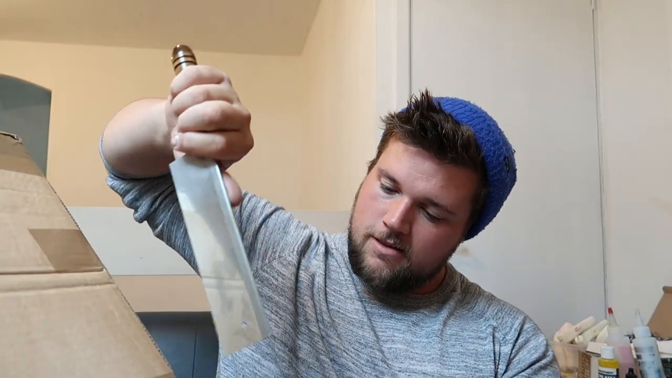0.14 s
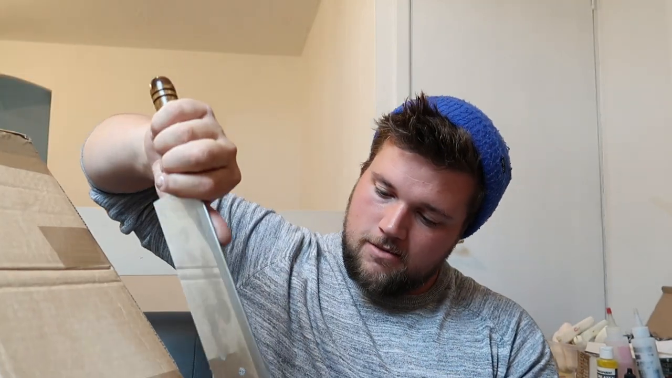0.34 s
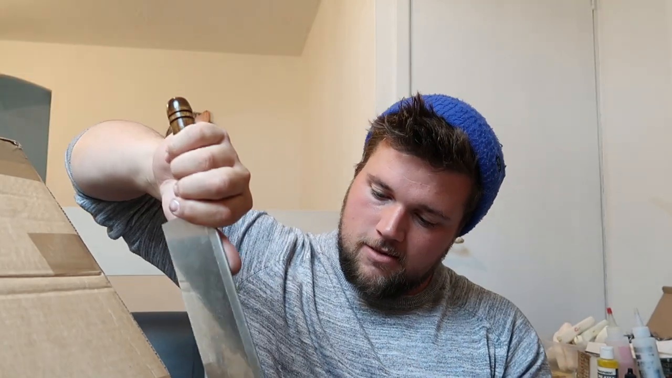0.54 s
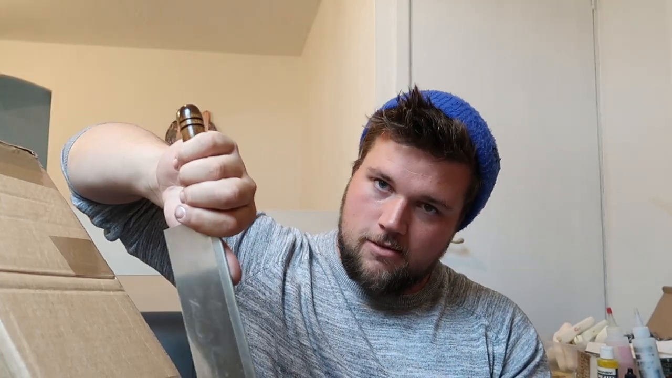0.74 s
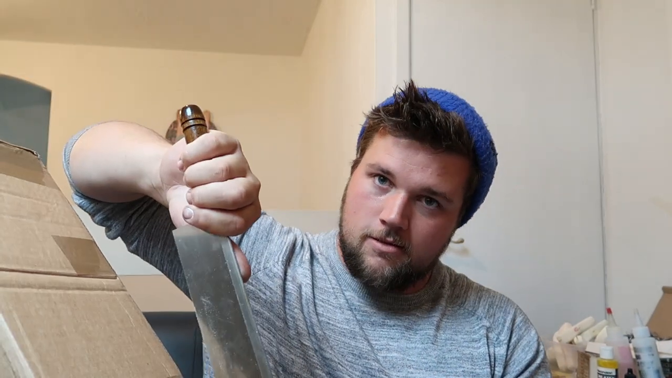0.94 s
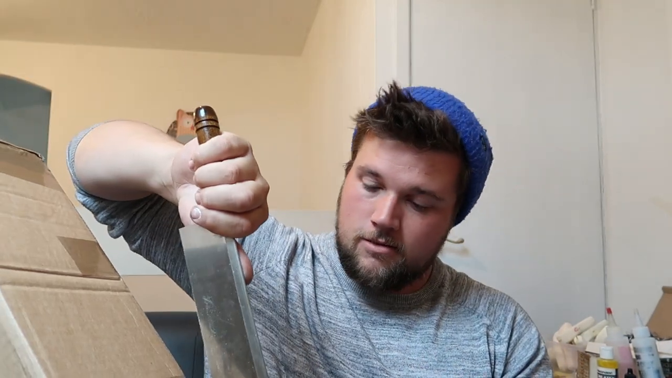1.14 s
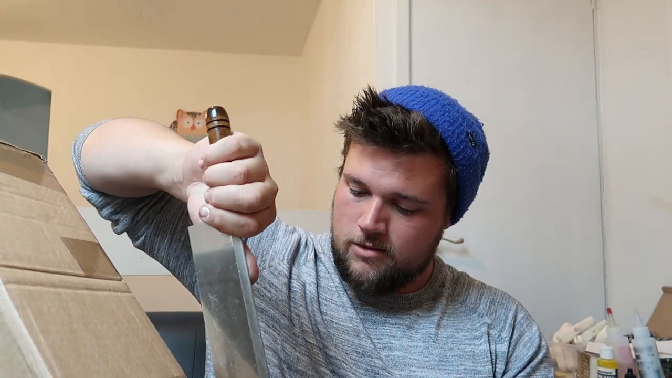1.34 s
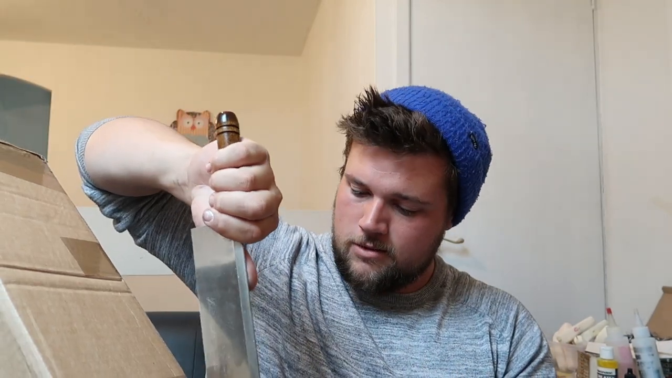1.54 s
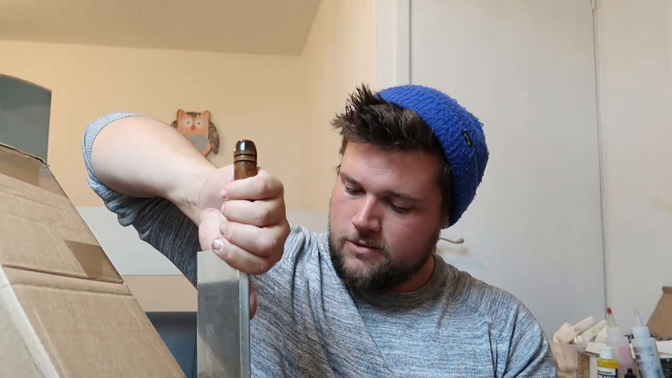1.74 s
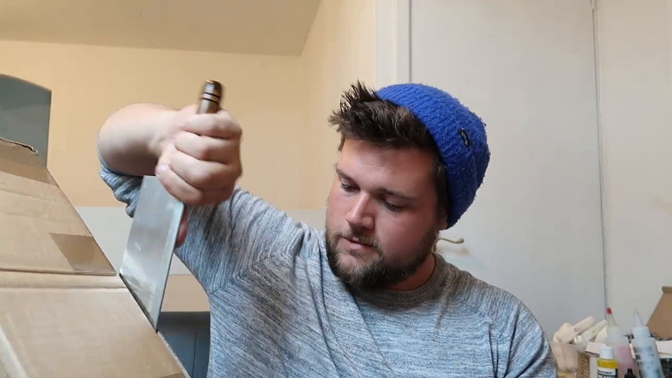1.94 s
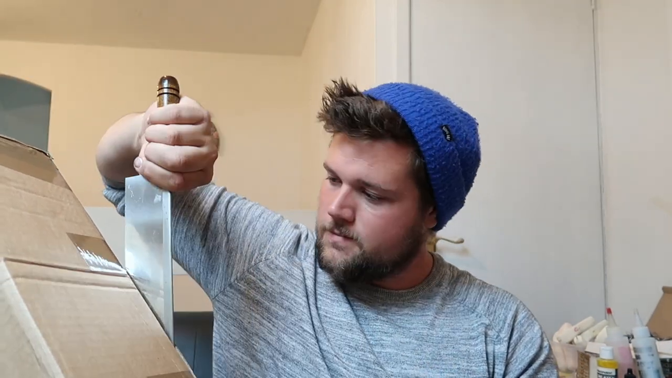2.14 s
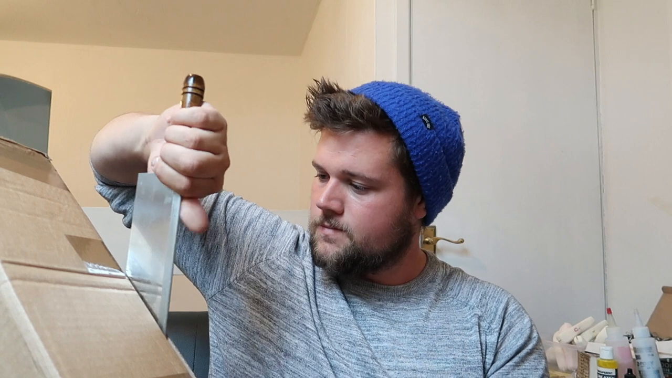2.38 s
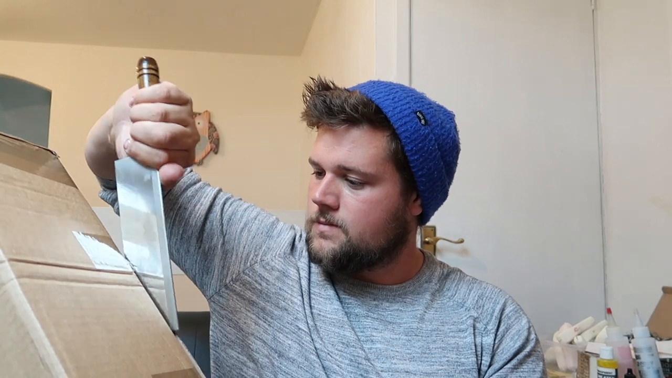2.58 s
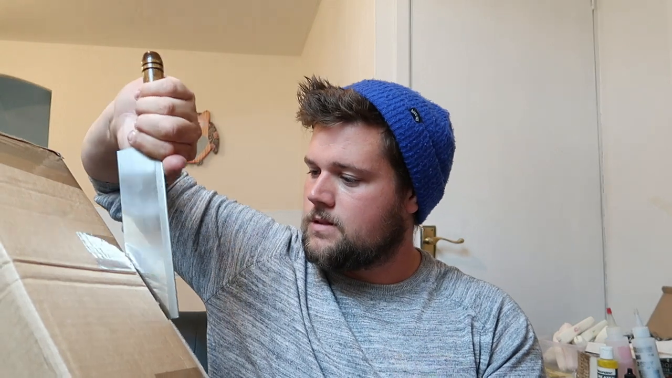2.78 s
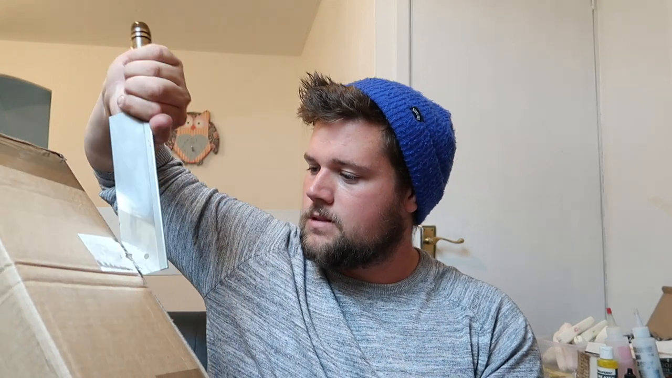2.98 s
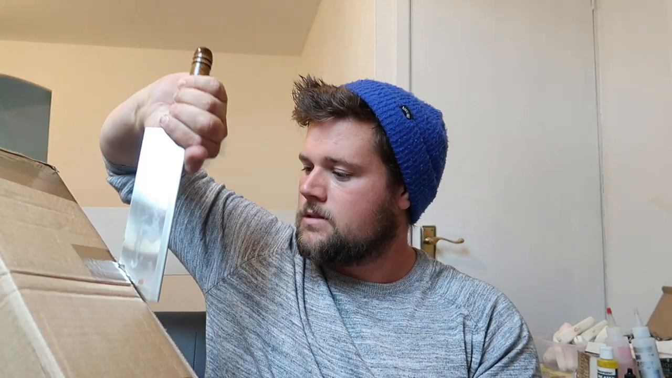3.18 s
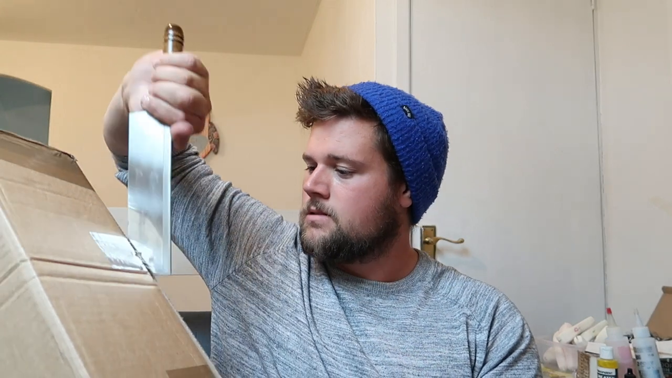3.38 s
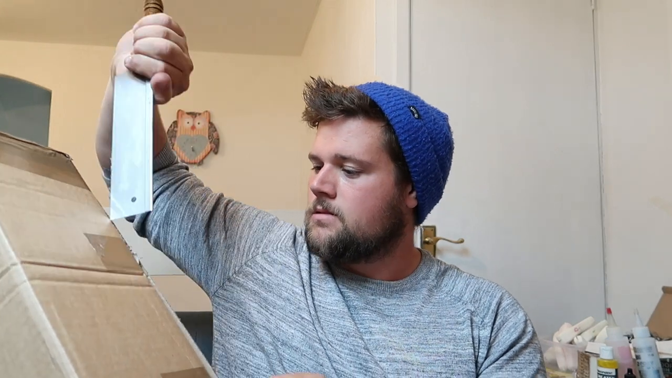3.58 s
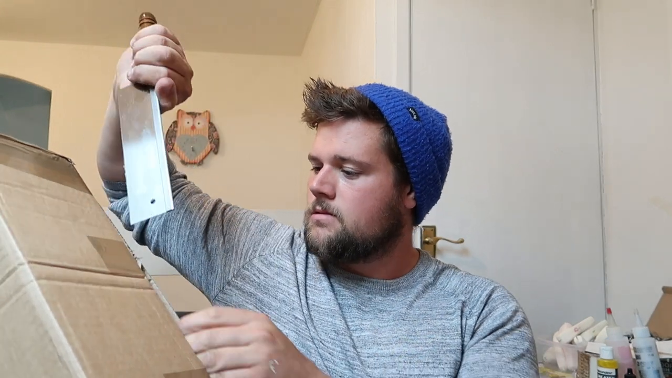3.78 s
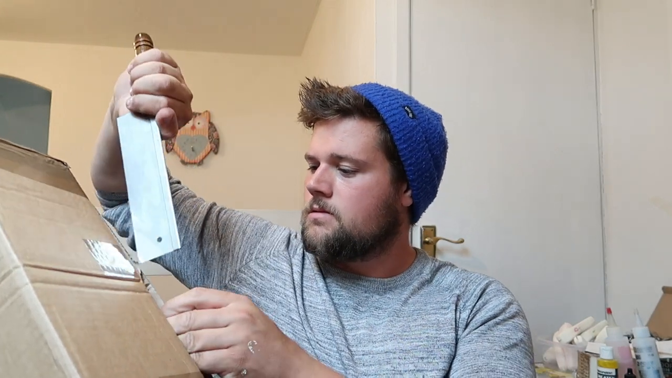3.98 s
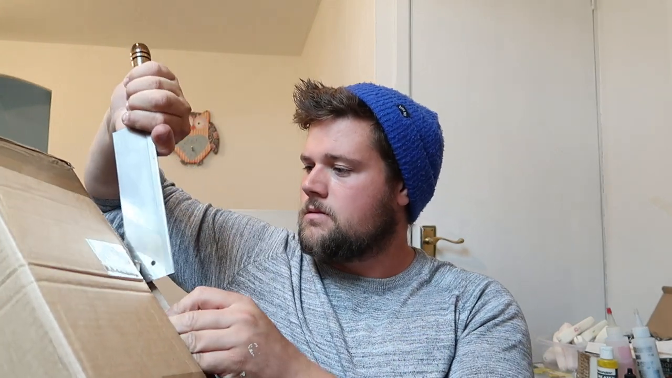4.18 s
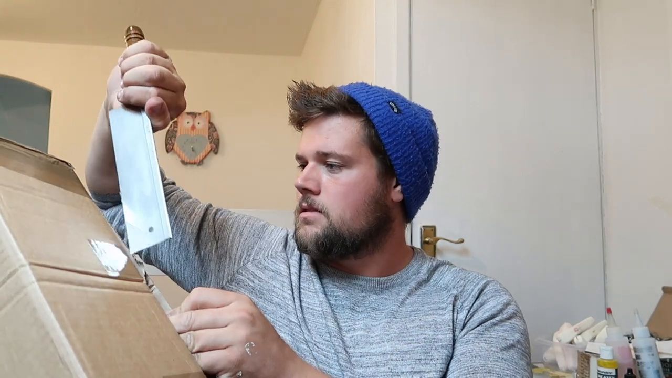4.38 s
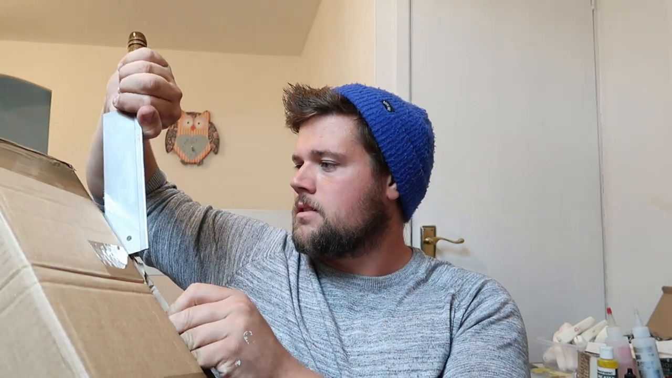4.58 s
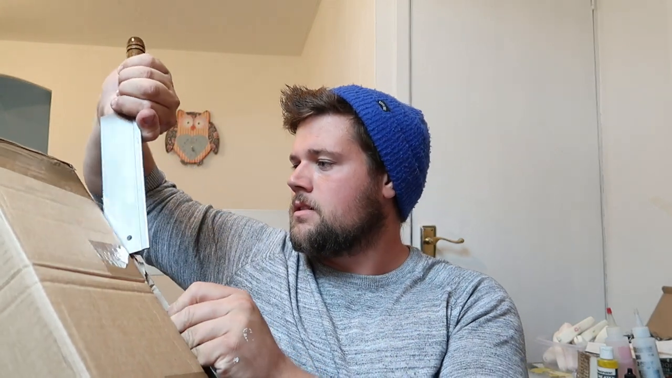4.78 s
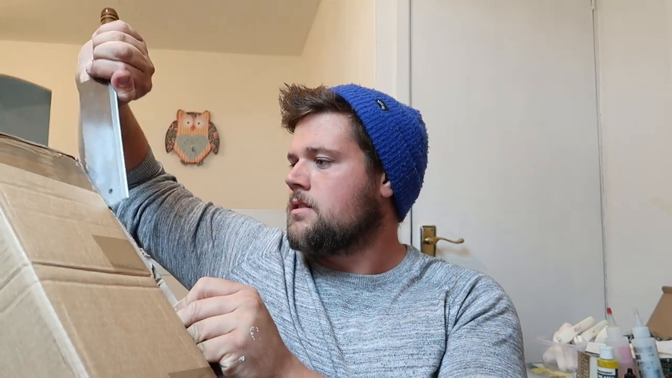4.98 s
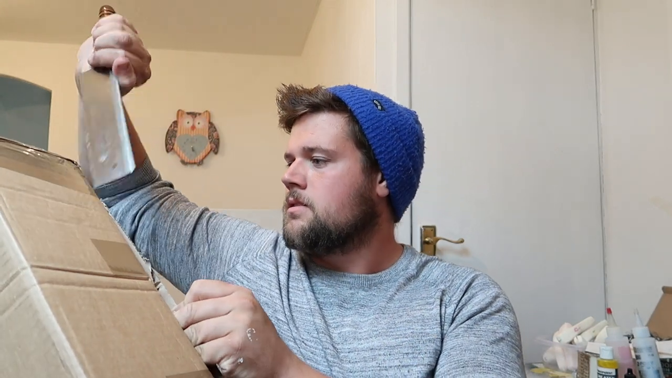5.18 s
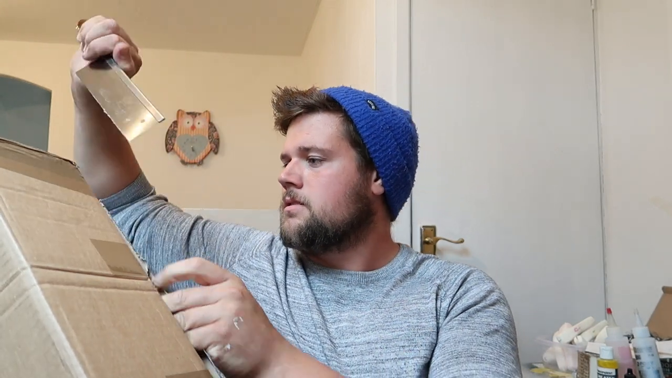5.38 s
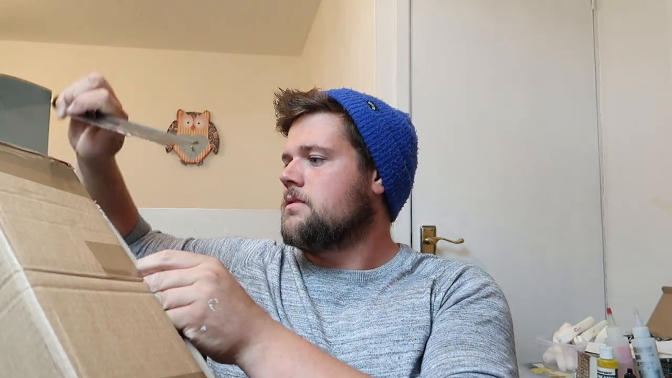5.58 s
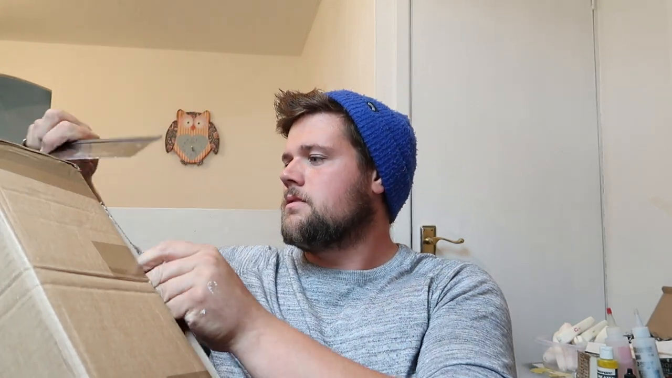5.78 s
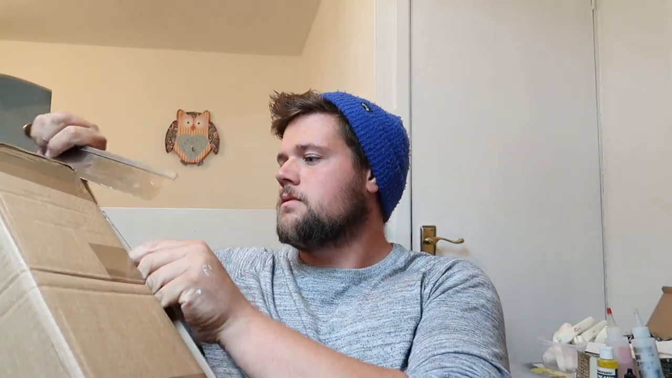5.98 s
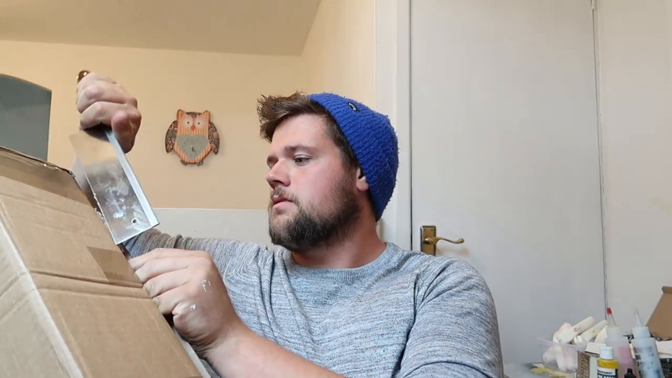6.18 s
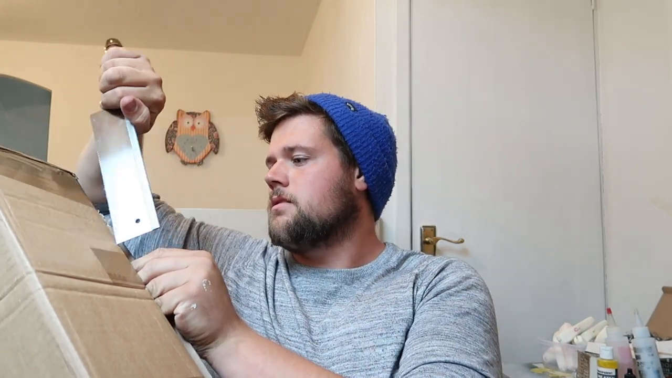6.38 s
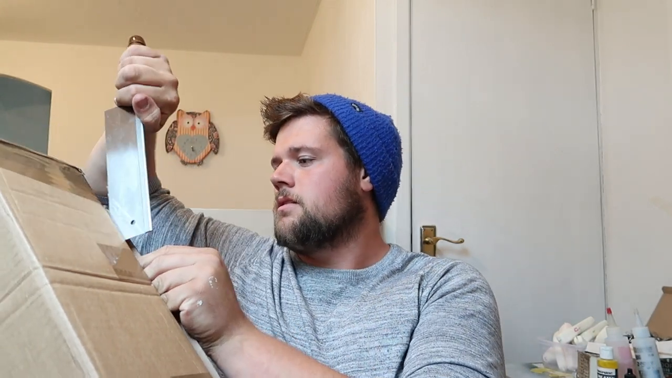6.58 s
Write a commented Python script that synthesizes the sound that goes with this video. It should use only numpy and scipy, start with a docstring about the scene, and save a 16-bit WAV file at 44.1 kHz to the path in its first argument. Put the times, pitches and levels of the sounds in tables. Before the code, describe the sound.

A steel knife saws through tape and cardboard on a large hollow box, heard close in a small room over faint room tone. A sharp crack and a booming scrape open at 0.1 seconds. Lighter, uneven rasps follow, with small cracks and faint metallic ticks from about 0.7 to 1.4 seconds. From 1.7 to 2.1 seconds the strokes turn forceful, tearing and hissing, with a loud snap near 1.9. Another snap comes at 2.5, then heavy strokes with brief squeaks and hollow booms around 3 and 3.5 seconds. Quieter scraping and small chirps continue until a strong, resonant, squeaking stroke at about 5 seconds. The cutting then softens to light scrapes, with a crack and thud at 6.2 seconds and a last short scrape with a faint ring of steel at 6.5.

```python
"""A broad steel blade saws at the tape and edge of a large hollow cardboard box in a small room.
Fibres fracture in showers of impulses, heard as rasp, scrape and hiss, while uneven slips force the
panels to boom at their resonances. Catches crack and thud, some strokes squeak, and the struck steel
rings in damped modes. Two close microphones hear the same bass and unlike treble over faint room tone."""
import sys
import numpy as np
from scipy import signal
from scipy.fft import rfft, irfft
from scipy.io import wavfile
from scipy.ndimage import uniform_filter1d

SR = 44100
rng = np.random.default_rng(int(sys.argv[2]) if len(sys.argv) > 2 else 0)


def log_audio(samples):
    """Write samples as a 16-bit WAV file to the path given in sys.argv[1]."""
    # one column per channel
    frames = np.atleast_2d(samples).T
    # limit to full scale, then quantise
    limited = np.clip(frames, -1, 1)
    pcm = np.round(limited * 32767).astype(np.int16)
    wavfile.write(sys.argv[1], SR, pcm)


N = 291942

# strokes, slides and jerks of the blade:
# (peak time [s], rise [s], fall [s], scrape [dB], tape hiss [dB], main panel [dB], upper panels [dB])
BLADE_STROKES = [(-0.008, 0.398, 0.3, -27.5, -39.5, -54, -57), (0.097, 0.05, 0.12, -22, -43, -23.5, -16),
                 (0.356, 0.075, 0.13, -28, -42, -46, -50), (0.501, 0.043, 0.12, -42, -52, -45, -37),
                 (0.608, 0.036, 0.028, -37.5, -61, -45, -38.5), (0.706, 0.017, 0.021, -51, -69, -44, -46),
                 (0.782, 0.21, 0.25, -44, -57, -45, -41.5), (0.824, 0.049, 0.035, -27.5, -41, -43, -53),
                 (0.937, 0.027, 0.082, -29.5, -61, -52, -30.5), (1.129, 0.039, 0.015, -62, -66, -35, -43),
                 (1.235, 0.0037, 0.032, -48, -52, -37, -45), (1.351, 0.0055, 0.11, -41, -63, -47, -59),
                 (1.488, 0.056, 0.018, -52, -72, -37, -60), (1.607, 0.062, 0.023, -36, -56, -35.5, -34),
                 (1.674, 0.042, 0.46, -40, -53, -49, -39), (1.722, 0.003, 0.08, -25, -33, -17, -27.5),
                 (1.703, 0.0044, 0.036, -31, -57, -24.5, -35),
                 (1.788, 0.055, 0.058, -19.5, -26.5, -22.5, -26),
                 (1.936, 0.076, 0.1, -24.5, -36.5, -26.5, -28), (2.03, 0.049, 0.055, -27, -37, -28.5, -21),
                 (2.163, 0.2, 0.12, -35.5, -50, -43, -38.5), (2.365, 0.05, 0.23, -38.5, -51.5, -41, -48.5),
                 (2.55, 0.0053, 0.083, -32.5, -37, -33, -26), (2.67, 0.075, 0.12, -29, -36, -21, -24),
                 (2.941, 0.044, 0.018, -46, -51, -36, -10), (2.855, 0.02, 0.026, -49, -50, -39, -54),
                 (2.961, 0.1, 0.12, -26.5, -33.5, -15, -21), (3.011, 0.028, 0.029, -31.5, -37, -12.5, -29),
                 (3.17, 0.13, 0.088, -50, -54.5, -64, -48), (3.302, 0.045, 0.071, -29, -38, -21, -28.5),
                 (3.495, 0.043, 0.03, -30, -36, -10, -21), (3.568, 0.25, 0.18, -30, -44, -29.5, -31.5),
                 (3.755, 0.052, 0.021, -58, -55, -36.5, -53), (3.87, 0.21, 0.16, -33.5, -39, -56, -93),
                 (4.166, 0.063, 0.021, -35, -53.5, -60, -52), (4.222, 0.069, 0.11, -33.5, -48, -41.5, -48),
                 (4.296, 0.028, 0.031, -23.5, -38, -60.0, -61), (4.347, 0.047, 0.066, -56, -64, -40, -39),
                 (4.454, 0.2, 0.051, -34, -46, -43, -42), (4.681, 0.083, 0.074, -34.5, -48, -30.5, -31),
                 (4.912, 0.017, 0.11, -29, -43.5, -26, -23.5), (4.972, 0.056, 0.036, -30, -54, -12, -36),
                 (5.03, 0.11, 0.13, -24.5, -30.5, -18, -18), (5.063, 0.12, 0.12, -25.5, -32, -44, -23),
                 (5.237, 0.046, 0.075, -42.5, -54.5, -40.5, -35.5),
                 (5.432, 0.042, 0.22, -38.5, -44.5, -60, -76),
                 (5.577, 0.26, 0.25, -42.5, -50.5, -50.5, -51.5), (5.921, 0.14, 0.23, -46, -55, -67, -45),
                 (6.153, 0.026, 0.062, -45, -57.5, -54, -58), (6.228, 0.037, 0.16, -40.5, -58.5, -40, -33),
                 (6.528, 0.027, 0.061, -35.5, -50.5, -60, -42)]
# resonances of the board and of the box panels: (frequency [Hz], bandwidth [Hz], gain [dB])
BOARD_MODES = [(514, 78, -0.5), (702, 51, -1.5), (772.7, 16, 4.5), (880, 79, -1), (1020, 113, -0.5),
               (1313, 320, -6)]
PANEL_MODES = [(61, 10, -14.5), (114.2, 22.5, 0), (206.3, 48, 6.5), (264.3, 51, 0), (349.2, 53, 8),
               (442, 99, -3.5)]
# swing of the largest panels: (time [s], level re main panel [dB])
DEEP_PANEL_LEVELS = [(0, 4), (1.2, -1.5), (1.75, -9), (1.95, -4), (2.7, -3), (3, -15), (4, -19),
                     (6.62, -26)]
# spectra of cut edge, tape, room tone and cracks: (frequency [Hz], relative spectral density [dB])
SCRAPE_SPECTRUM = [(650, -3.5), (1100, -13.5), (1360, -11.5), (1480, -4), (1990, -3.5), (3300, -6.5),
                   (4840, -23.5), (5500, -14.5), (7150, -25.5), (12100, -120)]
HISS_SPECTRUM = [(2350, -25.5), (4000, -0.5), (4840, 2.5), (6470, -0.5), (8550, -6), (12800, -9.5),
                 (14000, -18), (16000, -43)]
ROOM_TONE_SPECTRUM = [(15, -65), (25, 6.5), (145, 5), (200, 7.5), (263, 0.5), (489, 4.5), (677, -6),
                      (2840, -16.5), (6380, -27.5), (9840, -37.5), (12500, -37), (16000, -78)]
CRACK_SPECTRUM = [(290, -13.5), (500, -4.5), (1260, -11), (1740, -8.5), (4340, -19), (7530, -37),
                  (12700, -43.5), (14900, -46), (16000, -76)]
# contrast between the microphones: (frequency [Hz], left-right difference re sum [dB])
SIDE_SPECTRUM = [(60, -31), (130, -44), (290, -19), (640, -18.5), (1410, -18), (3100, -11.5), (6820, 1.5),
                 (15000, 7.5)]
# catches and knocks: (time [s], crack peak [dB], thud re crack [dB])
BLADE_CATCHES = [(0.001, -34.5, 19.5), (0.0843, -7, 0.5), (0.605, -32.5, -1), (0.703, -42, -9),
                 (0.7445, -25, -7), (0.7736, -17.5, -22), (0.8773, -26, -4), (0.923, -27, -7),
                 (0.955, -22.5, -15), (1.1012, -55, 0), (1.1227, -45, 15), (1.2341, -26.5, -6.5),
                 (1.3238, -47.5, 8), (1.3497, -45, -22), (1.543, -40, -3), (1.598, -27, -3),
                 (1.6576, -14, -12), (1.7005, -33, -14), (1.718, -16, -24), (1.8982, -20, -9),
                 (1.9257, -1.5, -18), (1.985, -18, 9.5), (2.0172, -14, -18), (2.129, -25, -15),
                 (2.503, -33.5, -4), (2.5502, -5.5, -12), (2.638, -25, 0), (2.8819, -35.5, 16),
                 (3.165, -40, -13), (3.283, -16, -15), (3.4482, -22.5, 4), (3.4843, -10, -30),
                 (4.035, -27, -9), (4.299, -22, -19), (4.455, -22.5, -20), (4.5634, -26, 1.5),
                 (4.6081, -27.5, 0), (4.637, -41, 20), (4.9085, -20, -3), (5.241, -49, 3),
                 (5.3969, -40.5, 11), (6.2068, -12, 9), (6.5166, -29, -17)]
# squeaks and chirps within the strokes: (onset [s], duration [s], frequency [Hz], level [dB])
STROKE_SQUEAKS = [(0.325, 0.097, 736, -48), (0.335, 0.078, 1460, -29), (0.315, 0.096, 2630, -27),
                  (0.927, 0.038, 726, -24), (0.938, 0.062, 2760, -36), (1.716, 0.1, 740, -26),
                  (1.72, 0.11, 2200, -26), (2.617, 0.11, 3060, -29), (2.855, 0.092, 2750, -30),
                  (2.913, 0.14, 545, -22.5), (3.265, 0.084, 544, -22.5), (3.511, 0.2, 524, -26),
                  (4.11, 0.1, 505, -42), (4.19, 0.047, 1950, -36), (4.255, 0.044, 2750, -31.5),
                  (4.267, 0.037, 1580, -27.5), (4.382, 0.15, 1990, -35), (4.446, 0.061, 508, -33.5),
                  (4.671, 0.05, 2250, -31.5), (2.916, 0.094, 364, -20.5), (5.024, 0.076, 338.4, -10),
                  (4.892, 0.29, 1513, -25), (4.925, 0.085, 1790, -29), (4.981, 0.062, 1635, -20.5),
                  (6.478, 0.0086, 2150, -39)]
# modes of the free blade: (frequency [Hz], level [dB], time to decay by 60 dB [s])
STEEL_MODES = [(883, 7.5, 0.5), (1190, -2, 0.34), (1635, -19, 0.057), (1680, -27, 0.15), (2250, 4, 0.12),
               (2770, -1, 0.11), (3350, -2.5, 0.16)]
# contacts that ring the steel, gripped by the cut:
# (time [s], level [dB], ring time re free blade [ratio], pitch re free blade [ratio], overtones [dB])
STEEL_TAPS = [(.703, -38, 0.15, 1.48, -15), (.745, -33, 0.43, 1.24, -3), (.775, -31.5, 0.67, 1.04, -1),
              (.803, -42, 0.61, 1.3, 17.5), (0.841, -37, 0.21, 1.2, -7), (.877, -32, 0.18, 1.01, 7),
              (0.951, -32.5, 0.64, 1.1, 9), (1.123, -42, 0.18, 1.24, -8), (1.352, -37.5, 0.59, 1.025, 6.5),
              (1.353, -47, 0.72, 1.42, -10), (1.412, -37.5, 0.38, 1.26, -6),
              (4.565, -37.5, 0.77, 0.92, -4.5), (6.531, -31, 0.87, 0.995, -2)]

# envelopes: drop at one rise before or one fall after the peak; exponent (2 = bell, more = flatter top)
TEAR_DROP_DB, TEAR_EXPONENT = 18.5, 1.9
BOOM_DROP_DB, BOOM_EXPONENT = 34, 2.8   # panels answer only under firm pressure
RASP_SCRAPE_SHARE, RASP_OFFSET_DB = 0.81, -0.76   # the rasp's level lies between scrape and upper panels
JUDDER_DB, SMOOTH_HISS_GAIN = 2.0, 1.3
ROOM_TONE_DB, REVERB_DB, REVERB_T60_S = -45.5, -11, 0.09
CRACK_T60_S, THUD_FADE_SHARE = 0.012, 0.13   # thuds take this share of the largest panels' fading
TAP_CONTACT_S, CHATTER_DEPTH, CHATTER_HZ = 0.0011, 1.2, 90
CUTOFF_HZ = 16300


def from_db(db):
    """Amplitude grows tenfold for every 20 dB."""
    return 10 ** (np.asarray(db) / 20)


def unit_rms(x):
    """Normalisation to unit mean power."""
    return x / np.sqrt(np.mean(x ** 2) + 1e-20)


def colour(x, spectrum):
    """Minimum-phase filtering: the folded cepstrum gives a causal response with the stated gains."""
    size = 4096
    hz = np.maximum(np.arange(size // 2 + 1) * SR / size, 1)
    point_hz, point_db = np.maximum(np.array(spectrum, float), [1, -90]).T
    cepstrum = irfft(np.interp(np.log(hz), np.log(point_hz), point_db) * np.log(10) / 20)
    cepstrum[1:size // 2] *= 2
    cepstrum[size // 2 + 1:] = 0
    return signal.fftconvolve(x, irfft(np.exp(rfft(cepstrum))))[:N]


def resonate(x, modes):
    """Modal superposition: damped resonators share one drive and add with alternating signs."""
    out = 0
    for k, (hz, width_hz, db) in enumerate(modes):
        r = np.exp(-np.pi * width_hz / SR)
        poles = [1, -2 * r * np.cos(2 * np.pi * hz / SR), r * r]
        response = (1 - r * r) / 2 * signal.lfilter([1, 0, -1], poles, x + 1e-18)
        out = out + (-1) ** k * from_db(db) * response
    return out


def soften(x, hz):
    """Low-pass action of a blunt contact, which carries little treble."""
    return signal.sosfilt(signal.butter(2, hz, fs=SR, output="sos"), x)


def steady(x, amount):
    """Envelope compression: a slip-driven vibration holds its swing, so its level is partly evened."""
    envelope = np.sqrt(uniform_filter1d(x ** 2, size=900) + 0.0011 * np.mean(x ** 2))
    return unit_rms(x / envelope ** amount)


def drift(hz):
    """Low-passed noise gives a slow random fluctuation of unit rms."""
    r = np.exp(-2 * np.pi * hz / SR)
    return unit_rms(signal.lfilter([1], [1, -2 * r, r * r], rng.standard_normal(N + SR))[SR:])


def fibre_snaps(per_s, spread_db, clump_db):
    """Shot noise: fibres snap at random, a few much harder than the rest, and in clumps."""
    sizes = from_db(spread_db * np.minimum(rng.exponential(1, N), 5)) * rng.choice([-1, 1], N)
    snapped = rng.random(N) < per_s / SR
    return unit_rms(sizes * snapped * from_db(clump_db * drift(25)))


def stroke_levels():
    """Incoherent addition: strokes swell and die, summing in power to four level curves in dB."""
    power, t = np.zeros((4, N)), np.arange(N) / SR
    for s, rise, fall, *peaks_db in BLADE_STROKES:
        near = slice(max(round((s - 2 * rise) * SR), 0), max(round((s + 2 * fall) * SR), 0))
        away = np.where(t[near] < s, (s - t[near]) / rise, (t[near] - s) / fall)
        tear_drop = TEAR_DROP_DB * away ** TEAR_EXPONENT
        boom_drop = BOOM_DROP_DB * away ** BOOM_EXPONENT
        levels_db = np.array(peaks_db)[:, None] - [tear_drop, tear_drop, boom_drop, boom_drop]
        power[:, near] += from_db(2 * levels_db)
    return 10 * np.log10(power + 1e-9)


def tearing(scrape_db, hiss_db, upper_db):
    """Fracture excites board, cut edge and tape; stick-slip friction modulates all three."""
    coarse = fibre_snaps(1200, spread_db=1.5, clump_db=-1.0)
    fine = fibre_snaps(5000, spread_db=0.5, clump_db=-0.5)
    rasp = unit_rms(soften(resonate(coarse, BOARD_MODES), hz=1800))
    rasp_db = RASP_OFFSET_DB + RASP_SCRAPE_SHARE * scrape_db + (1 - RASP_SCRAPE_SHARE) * upper_db
    # flaps of the cut edge resonate, each waxing and waning as the contact moves
    flaps = sum(from_db(4.2 * drift(5.6)) * resonate(fine, [(hz, hz / 26, 0)])
                for hz in np.geomspace(1200, 4800, 16))
    crackle = fibre_snaps(350, spread_db=2.5, clump_db=2.5)
    scrape = unit_rms(colour(fine + 0.9 * unit_rms(flaps) + 0.49 * crackle, SCRAPE_SPECTRUM))
    hiss = unit_rms(colour(fine + SMOOTH_HISS_GAIN * rng.standard_normal(N), HISS_SPECTRUM))
    judder = from_db(JUDDER_DB * drift(73))
    return judder * (from_db(scrape_db) * scrape + from_db(rasp_db) * rasp + from_db(hiss_db) * hiss)


def deep_panel_db():
    """Coupling depends on the driving point: the largest panels answer by where the blade bears."""
    return np.interp(np.arange(N) / SR, *np.transpose(DEEP_PANEL_LEVELS))


def panel_boom(boom_db, upper_db):
    """Forced vibration: uneven slips shake the panels, which respond near their natural frequencies."""
    slips = soften(fibre_snaps(1500, spread_db=2.5, clump_db=4.5), hz=940)
    deep = unit_rms(resonate(slips, PANEL_MODES[:2]))
    main = resonate(slips, PANEL_MODES[2:3])
    main = steady(resonate(main, [(PANEL_MODES[2][0], 45, 0)]), amount=0.56)   # narrows the band
    hollow = steady(resonate(slips, PANEL_MODES[4:5]), amount=0.77)
    upper = unit_rms(steady(resonate(slips, PANEL_MODES[3:]), amount=0.34) + 0.56 * hollow)
    lower = main + from_db(deep_panel_db()) * deep
    return from_db(boom_db) * lower + from_db(upper_db) * upper


def room_tone():
    """Ambient noise: a faint, bass-heavy continuous spectrum whose level wanders slowly."""
    gain = from_db(ROOM_TONE_DB + 5.6 * drift(0.16))
    return gain * unit_rms(colour(rng.standard_normal(N), ROOM_TONE_SPECTRUM))


def reflections(x, t60):
    """Reverberation: dense echoes act as convolution with exponentially decaying noise of unit energy."""
    t = np.arange(round(t60 * SR)) / SR
    tail = rng.standard_normal(len(t)) * from_db(-60 * t / t60)
    return signal.fftconvolve(x, tail / np.sqrt(np.sum(tail ** 2)))[:N]


def catch_cracks():
    """A brief transient is broadband: each catch is one hard snap with a dying rustle."""
    bursts, t = np.zeros(N), np.arange(SR // 4) / SR
    decay = from_db(-60 * t / CRACK_T60_S)
    decay = decay + 0.5 * from_db(-60 * t / 0.057) + 0.15 * from_db(-60 * t / 0.13)
    for s, peak_db, _ in BLADE_CATCHES:
        i = round(s * SR)
        crack = (rng.standard_normal(len(t)) * decay + 0.44 * (t == 0))[:N - i]
        bursts[i:i + len(crack)] += from_db(peak_db) * crack / 2   # noise peaks near twice its rms
    filter_gain = np.sqrt(np.sum(colour(signal.unit_impulse(N), CRACK_SPECTRUM) ** 2))
    return colour(bursts, CRACK_SPECTRUM) / filter_gain


def catch_thuds():
    """Impulse response: each catch pushes panels and board once, and their modes decay freely."""
    s, peak_db, thud_db = np.transpose(BLADE_CATCHES)
    at = np.round(s * SR).astype(int)
    modes = PANEL_MODES + BOARD_MODES[:2]
    scatter_db = rng.normal(0, 2, (len(s), len(modes)))
    fade_db = THUD_FADE_SHARE * deep_panel_db()[at]
    thuds = 0
    for k, mode in enumerate(modes):
        push = np.zeros(N)
        level_db = peak_db + thud_db + scatter_db[:, k] + fade_db * (k < 2)
        push[at] = from_db(level_db) * SR / (4 * np.pi * mode[1])   # swing independent of bandwidth
        thuds = thuds + (-1) ** k * resonate(push, [mode])
    return soften(thuds, hz=1220)


def squeaks():
    """Narrow-band resonance gives noise a pitch; each squeak swells and fades."""
    out, noise = np.zeros(N), rng.standard_normal(N)
    for s, duration, hz, level_db in STROKE_SQUEAKS:
        i, span = round(s * SR), round(duration * SR)
        tone = steady(resonate(noise, [(hz, hz / 20, 0)]), amount=0.17)[i:i + span]
        out[i:i + span] += from_db(level_db) * np.hanning(span) * tone
    return out


def blade_ring():
    """Damped vibration of struck steel: a firmer grip shortens the ring and adds chatter on the board."""
    out, t = np.zeros(N + SR), np.arange(SR // 2) / SR
    chatter = drift(CHATTER_HZ)
    for s, tap_db, ring_share, pitch, overtone_db in STEEL_TAPS:
        i = round(s * SR)
        grip = np.clip(CHATTER_DEPTH * (1 - ring_share), 0, 1)
        for k, (hz, mode_db, t60) in enumerate(STEEL_MODES):
            level_db = tap_db + mode_db + overtone_db * (k > 0) + 1.2 * rng.standard_normal()
            envelope = (1 - np.exp(-t / TAP_CONTACT_S)) * from_db(level_db - 60 * t / (ring_share * t60))
            own_chatter = np.roll(chatter, -i - k * len(t))[:len(t)]
            roughness = 1 - grip + grip * own_chatter
            out[i:i + len(t)] += roughness * envelope * np.sin(2 * np.pi * hz * pitch * t)
    return out[:N]


def microphone_pair(mid):
    """Interference: shifting nearby reflections set two microphones apart, most at short wavelengths."""
    shifting = sum(drift(31) * reflections(mid, t60=0.066) for _ in range(4)) / 2
    side = colour(shifting, SIDE_SPECTRUM)
    return np.array([mid + side, mid - side])


def scene():
    """Superposition: direct sound, reverberation and room tone add at the microphones."""
    scrape_db, hiss_db, boom_db, upper_db = stroke_levels()
    direct = tearing(scrape_db, hiss_db, upper_db) + panel_boom(boom_db, upper_db)
    direct += catch_cracks() + catch_thuds() + squeaks() + blade_ring()
    reverb = np.roll(reflections(direct, REVERB_T60_S), 300)   # about 7 ms later
    return microphone_pair(direct + from_db(REVERB_DB) * reverb + room_tone())


def record(dry):
    """Soft saturation rounds the peaks, and a steep low-pass filter limits the bandwidth."""
    rounded = 1.162 * np.tanh(dry / 1.432)
    return signal.sosfilt(signal.cheby2(12, 70, CUTOFF_HZ, fs=SR, output="sos"), rounded)


dry = scene()
out = record(dry)
log_audio(out)
```